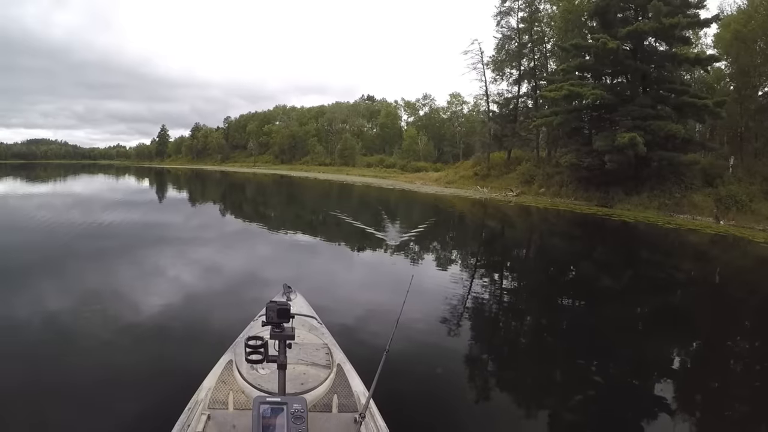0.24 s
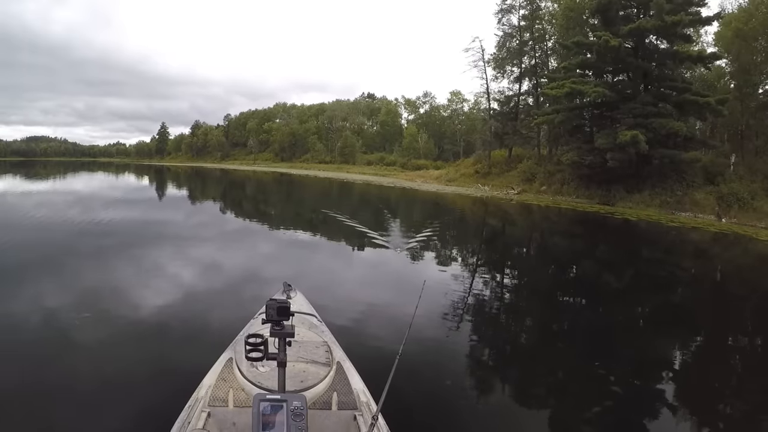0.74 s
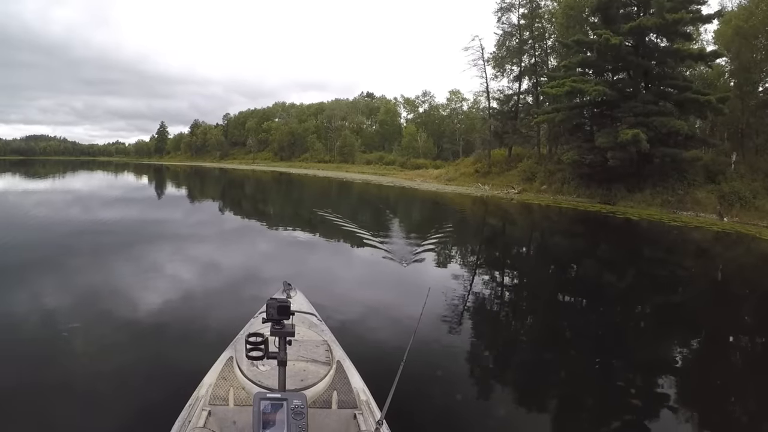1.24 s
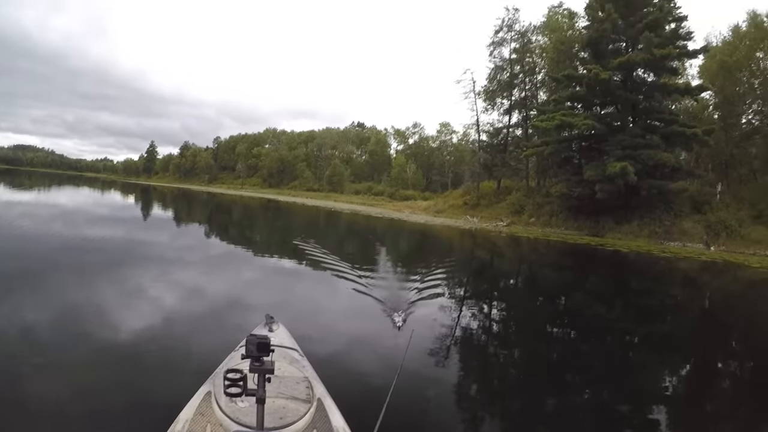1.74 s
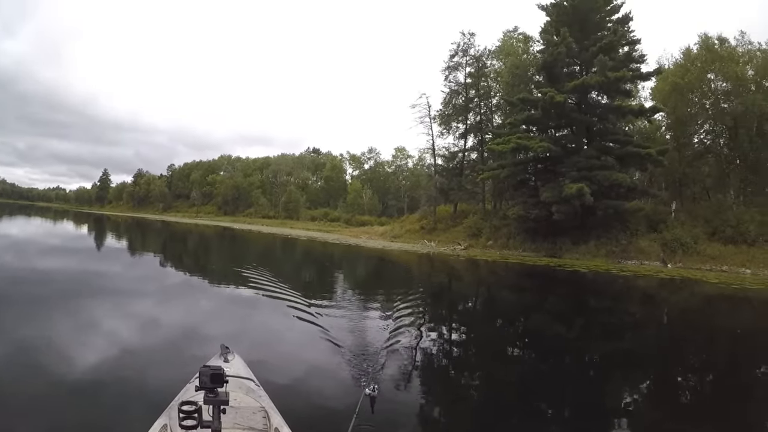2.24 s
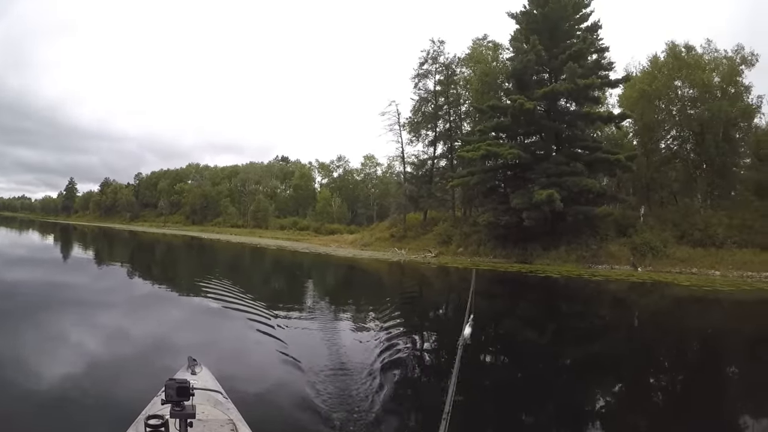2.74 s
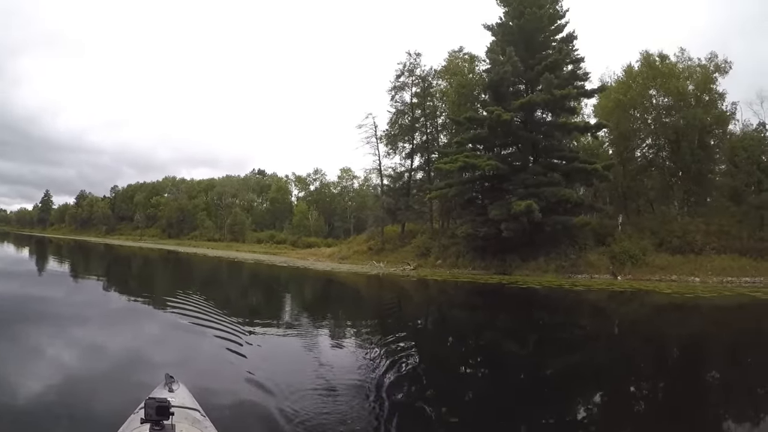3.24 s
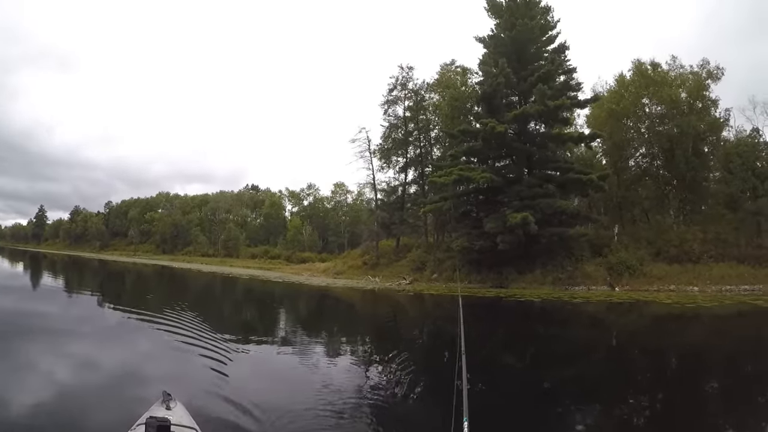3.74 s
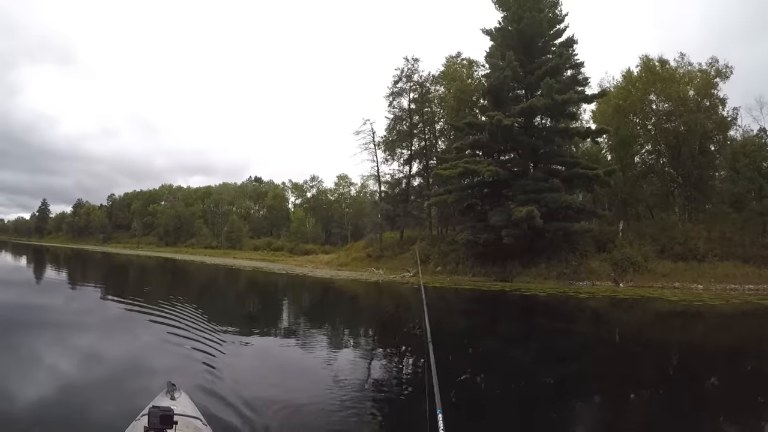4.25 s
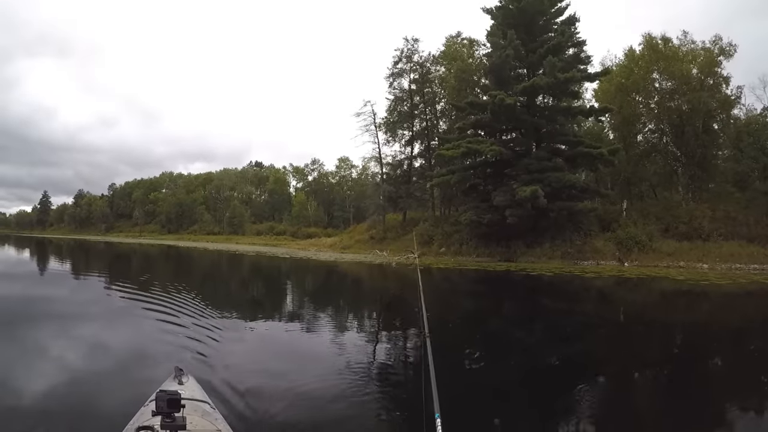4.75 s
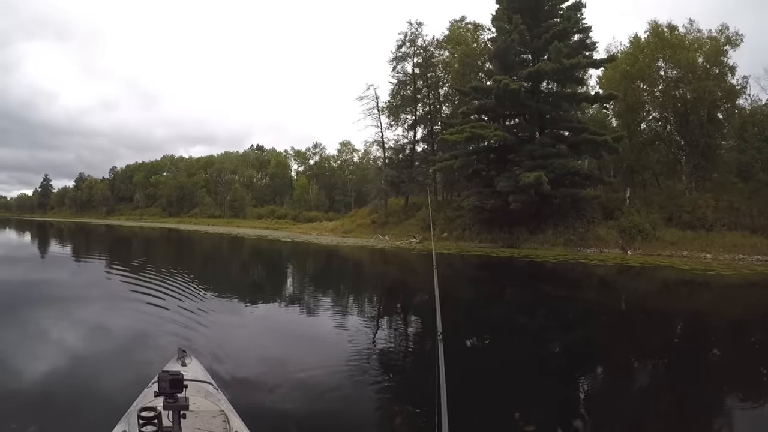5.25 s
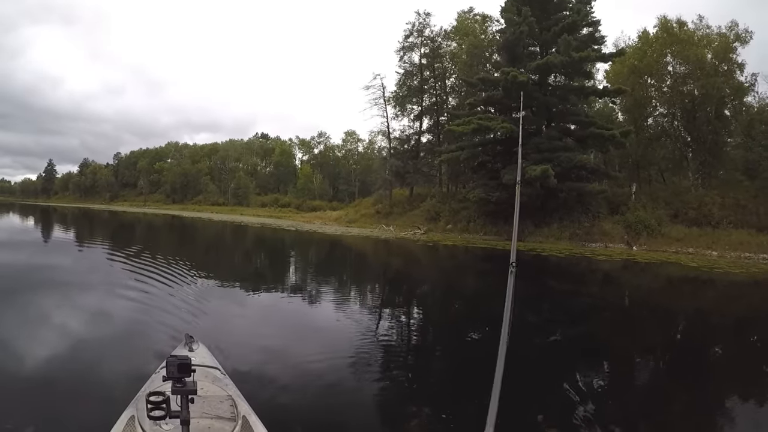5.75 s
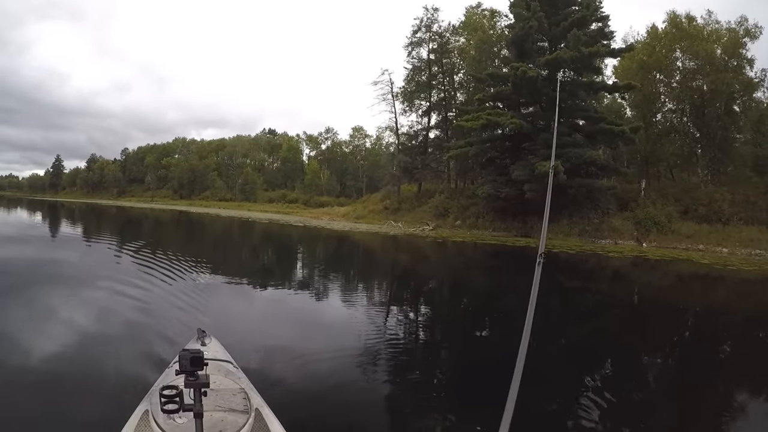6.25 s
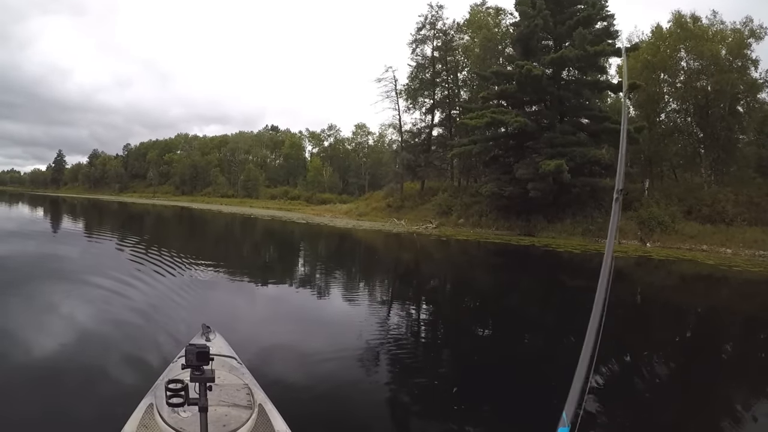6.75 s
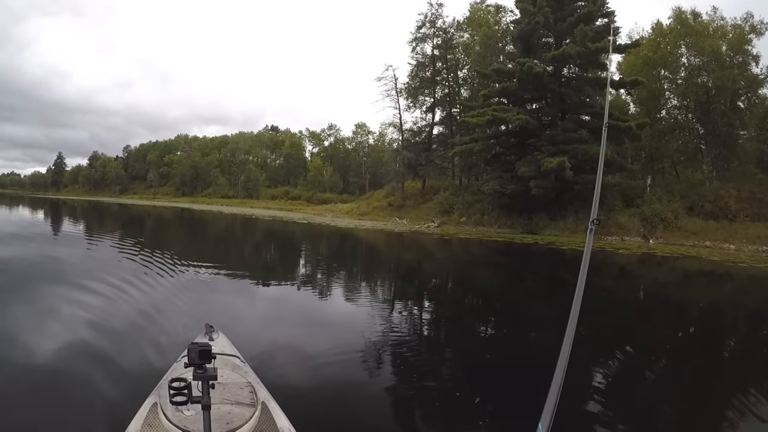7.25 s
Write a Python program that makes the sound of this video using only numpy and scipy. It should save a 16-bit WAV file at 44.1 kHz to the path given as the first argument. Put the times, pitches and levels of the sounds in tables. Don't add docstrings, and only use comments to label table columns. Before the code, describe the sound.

On a quiet lake, a lure burbles through the water, growing louder and splashier until it lifts out. A tiny squeak leads into a hard metallic reel click. The rod swishes, the spool buzzes and whirrs downward, and a thumb stops it as the lure plops faintly far away. A double metallic clack closes the reel. A faint insect trill and soft air continue throughout, heard by a small, close microphone with little deep bass.

```python
import sys
import numpy as np
from scipy import signal
from scipy.fft import rfft, irfft
from scipy.io import wavfile
from scipy.ndimage import uniform_filter1d

SR = 44100
rng = np.random.default_rng(int(sys.argv[2]) if len(sys.argv) > 2 else 0)


def pcm_store(signal):
    levels = np.round(np.clip(np.atleast_2d(signal), -1, 1) * 32767)
    wavfile.write(sys.argv[1], SR, levels.astype(np.int16).T)


def amplitude_ratio(level_db):
    exponent = np.asarray(level_db, float) / 20
    return 10 ** exponent


N = 329868


def evened(x):
    return x / np.sqrt(np.mean(x ** 2) + 1e-20)


def read(points, hz):
    f, value = np.transpose(points)
    return np.interp(np.log(hz + 1), np.log(f + 1), value)


def add(mix, start_s, sound):
    part = mix[round(start_s * SR):][:len(sound)]
    part += sound[:len(part)]


def controls(rows):
    times, *columns = np.transpose(rows)
    t = np.arange(times[0], times[-1], 1 / SR)
    return [times[0]] + [np.interp(t, times, column) for column in columns]


def noise(count):
    return rng.standard_normal(count)


def coloured(x, points):
    gain = amplitude_ratio(read(points, np.fft.rfftfreq(len(x), 1 / SR)))
    return evened(irfft(rfft(x) * gain, len(x)))


def wander(count, hz):
    width = int(SR / hz)
    return evened(uniform_filter1d(uniform_filter1d(noise(count), width), width))


def tone(hz):
    return np.sin(2 * np.pi * (np.cumsum(hz) / SR + rng.random()))


def resonate(x, hz, width_hz):
    turn = np.exp(2j * np.pi * np.cumsum(hz) / SR)
    r = np.exp(-np.pi * width_hz / SR)
    return 2 * (turn * signal.lfilter([1 - r], [1, -r], x / turn)).real


def bubble(hz, cycles, rise):
    u = np.arange(int(np.clip(cycles, 2, 40) * SR / hz)) * hz / SR
    ring = np.sin(2 * np.pi * u * (1 - 0.379 * rise + rise * u / cycles))
    swell = 1 - np.exp(-u / 0.75)
    return ring * swell * amplitude_ratio(-28 * (u / cycles) ** (1 + 2 * rise))


# [t/s, level/dB, brightness/dB per octave]
WAKE = [
    (0.0, -42.5, 1),
    (1.47, -44, -1.5),
    (1.59, -37.5, 0.5),
    (1.74, -36.5, 4.5),
    (2.09, -36, 2.5),
    (2.21, -36.5, 4.5),
    (2.38, -45, 2.5),
    (2.62, -71, 21.5),
]
# [f/Hz, level/dB per Hz]
FOAM = [(120, -46), (200, -10.5), (761, -4), (1110, -11.5), (1460, -4), (2130, -10), (3150, -12.5),
        (6050, -21.5), (8090, -18.5), (12000, -35), (15600, -76), (22000, -120)]
# [t/s, peak level/dB, f/Hz, climb in pitch/share]
BUBBLES = [(0.0615, -42.5, 912, 0.58), (0.1358, -36, 588, 0.03), (0.2333, -42.5, 760, 0.3),
           (0.272, -35, 840, 0.03), (0.2948, -37.5, 820, 0.11), (0.3267, -44, 703, 0.21),
           (0.5228, -39, 550, 0.03), (0.7717, -40.2, 752, 0.03), (0.9733, -40.5, 552, 0.11),
           (1.0751, -42, 905, 0.03), (1.3307, -39, 910, 0.03), (1.4451, -45, 804, 0.25),
           (1.4825, -37.4, 850, 0.03), (1.5108, -37, 856, 0.03), (1.5711, -37, 487, 0.12),
           (1.5872, -33, 844, 0.03), (1.6194, -31, 910, 0.13), (1.6716, -34.5, 800, 0.25),
           (1.6781, -37, 580, 0.45), (1.7111, -35.5, 586, 0.12), (1.7827, -34, 971, 0.03),
           (1.8799, -35.5, 960, 0.03), (1.9119, -33, 710, 0.03), (1.9402, -32.5, 560, 0.03),
           (1.9615, -38, 700, 0.52), (1.9781, -31.6, 519, 0.03), (1.9827, -43, 1110, 0.45),
           (2.0003, -36, 757, 0.31), (2.0703, -37, 912, 0.25), (2.0936, -36, 804, 0.03),
           (2.1244, -34.0, 900, 0.03), (2.1253, -36.5, 500, 0.3), (2.1348, -36, 710, 0.45),
           (2.1465, -27.5, 795, 0.03), (2.1824, -35, 560, 0.03), (2.1959, -39.5, 912, 0.25),
           (2.2491, -40, 667, 0.44), (2.2554, -29, 805, 0.26), (2.2668, -35, 980, 0.14),
           (2.297, -42.5, 620, 0.37), (2.369, -42, 804, 0.12),
           (0.0127, -40, 1767, 0.12), (0.0169, -43, 1487, 0.45), (0.0781, -38, 1621, 0.03),
          (0.198, -36, 1487, 0.03), (0.609, -38.5, 1365, 0.03), (0.7557, -36.5, 1553, 0.03),
          (0.8756, -29.5, 2100, 0.03), (0.9718, -40.5, 1440, 0.49), (1.017, -37.5, 1365, 0.03),
          (1.0946, -36, 1553, 0.03), (1.3135, -38, 1480, 0.03), (1.36, -34, 1700, 0.03),
          (1.5451, -36.4, 1300, 0.12), (1.563, -32.6, 1500, 0.03), (1.64, -32, 1553, 0.03),
          (1.6692, -32, 1767, 0.03), (1.6924, -29.9, 1300, 0.03), (1.8119, -33, 1830, 0.12),
          (1.8593, -35.5, 1767, 0.12), (1.868, -20.5, 1496, 0.027), (1.873, -30, 1470, 0.03),
          (1.9123, -31, 1487, 0.03), (1.9261, -41, 1693, 0.45), (1.9625, -36.3, 1320, 0.25),
          (1.9878, -25, 1400, 0.03), (1.9903, -41, 1365, 0.25), (2.0028, -29, 1440, 0.25),
          (2.0404, -30.9, 1540, 0.12), (2.0494, -32, 1310, 0.03), (2.108, -30.7, 1830, 0.03),
          (2.1165, -26, 1560, 0.03), (2.1441, -34.4, 1693, 0.12), (2.145, -42, 1130, 0.52),
          (2.1476, -22, 1415, 0.03), (2.1573, -32.5, 1621, 0.03), (2.1739, -29.8, 1365, 0.03),
          (2.2236, -31, 1630, 0.12), (2.261, -31, 1630, 0.03), (2.3307, -37, 2011, 0.12),
          (2.3596, -37.7, 1845, 0.03), (2.3672, -41, 2110, 0.25), (2.4042, -32, 1780, 0.03),
          (2.4104, -32.5, 1630, 0.12),
           (0.1222, -33, 2912, 0.03), (0.1355, -37, 2728, 0.03), (0.2123, -34, 2912, 0.03),
         (0.2439, -40, 2912, 0.25), (0.294, -36, 3500, 0.03), (0.494, -36, 2260, 0.03),
         (0.7045, -36.5, 3580, 0.03), (0.876, -32, 2350, 0.03), (0.9197, -38, 2242, 0.12),
         (1.0356, -34, 3783, 0.03), (1.119, -29.5, 2600, 0.03), (1.1262, -35, 3543, 0.03),
         (1.135, -41, 4914, 0.25), (1.1463, -37, 3319, 0.03), (1.1955, -37, 3500, 0.03),
         (1.2544, -27.5, 3050, 0.03), (1.3725, -41, 3109, 0.12), (1.4328, -39, 3109, 0.03),
         (1.6303, -33.5, 2912, 0.12), (1.7347, -36.4, 2912, 0.12), (1.7569, -35.5, 2912, 0.03),
         (1.8113, -33, 2555, 0.03), (1.8505, -35.2, 2370, 0.03), (1.8653, -38, 2728, 0.5),
         (1.9519, -29.5, 3580, 0.25), (1.9524, -33, 4311, 0.03), (1.9601, -34.9, 3543, 0.12),
         (2.0024, -32, 2300, 0.12), (2.0236, -22, 4070, 0.03), (2.028, -35.4, 2280, 0.33),
         (2.0492, -28, 4600, 0.03), (2.063, -26.5, 2420, 0.03), (2.1197, -30, 3130, 0.03),
         (2.1277, -31.9, 2393, 0.03), (2.1829, -16.5, 3170, 0.03), (2.1846, -31.8, 3109, 0.12),
         (2.2066, -25, 3800, 0.12), (2.2193, -36, 3319, 0.03), (2.2227, -35.1, 2393, 0.03),
         (2.2695, -33, 2242, 0.11), (2.2827, -31, 3109, 0.03), (2.324, -30, 3760, 0.03),
         (2.3255, -31, 3270, 0.03), (2.37, -28.2, 2393, 0.03), (2.3725, -34.6, 2540, 0.03),
         (2.5382, -36, 4070, 0.03)]
# [t/s, peak level/dB, f/Hz, climb in pitch/share]
GULPS = [
    (0.46, -46, 1100, .45),
    (0.985, -45, 650, 0.43),
    (1.155, -47, 790, .58),
    (1.338, -45, 950, 0.5),
    (2.19, -42, 598, 0.55),
]
# [t/s, peak level/dB, f/Hz]
LANDING = [(4.844, -42, 1430), (4.854, -43, 555), (4.891, -32, 587), (4.909, -46, 2980),
           (4.924, -41.5, 1290), (5.236, -44, 1330), (5.26, -47, 2000), (5.282, -46, 1250),
           (5.302, -45, 1550), (6.832, -46.5, 438), (6.879, -43, 735), (6.935, -40.5, 1230),
           (6.969, -43.5, 670)]
# [t/s, peak level/dB, f/Hz]
SPRAY = [(0.0957, -44, 2830), (0.1644, -44, 2740), (0.3516, -36, 3360), (0.395, -38, 3500),
         (0.6194, -39, 4090), (0.642, -40, 4000), (0.6674, -39, 2870), (0.7264, -40, 3430),
         (0.738, -40, 3500), (0.8244, -43, 3010), (0.852, -35, 2330), (0.949, -35, 2430),
         (0.972, -36, 3200), (1.297, -38, 1700), (1.3944, -43, 3500), (1.4583, -40, 3000),
         (1.7245, -37, 1960), (1.783, -34, 2370), (1.925, -38, 1970), (2.1061, -33, 1840),
         (2.2702, -32, 2420), (0.117, -41, 1400), (0.493, -40, 1580), (0.682, -39, 1400),
         (0.683, -41, 2900), (1.222, -39, 1450), (1.395, -41, 600), (1.614, -36, 4450), (1.677, -37, 4550),
         (1.764, -35, 3700), (1.811, -35, 4500), (1.845, -36, 4550), (1.925, -35, 3600), (1.958, -33, 4700),
         (2.196, -33, 5400)]
# [t/s, peak level/dB, f/Hz, length/cycles]
RIPPLES = [
    (3.79, -37, 275, 6.8),
    (2.2435, -16.5, 7600, 7.1),
    (5.19, -47, 3060, 18),
    (2.886, -38, 4200, 9.),
    (1.63, -37.5, 220, 5.4),
    (2, -50, 193, 7.),
    (6.9, -52, 1700, 27),
]


def lure(mix):
    start_s, level_db, tilt_db = controls(WAKE)
    count = len(level_db)
    crowd = np.zeros(count)
    for hz in np.geomspace(430, 5200, num=40):
        octaves = np.log2(hz / 1000)
        births = rng.random(count) < 38 / SR
        size = amplitude_ratio(5.5 * np.minimum(rng.exponential(1, count), 1.9)) * births
        pop = bubble(hz, rng.uniform(7.5, 19.0), rng.uniform(0.02, 0.49))
        pop = pop * np.sqrt(hz / 1000) * amplitude_ratio(read(FOAM, hz) + 0.9 * octaves)
        crowd += signal.oaconvolve(size * amplitude_ratio(tilt_db * octaves), pop)[:count]
    fizz = coloured(noise(count), FOAM) * amplitude_ratio(1.5 * wander(count, 40))
    water = amplitude_ratio(-0.5) * evened(crowd) + amplitude_ratio(-12) * fizz
    fade_out = signal.windows.tukey(2 * count, 0.1)[count:]
    add(mix, start_s, amplitude_ratio(level_db) * water * fade_out)

    ring_cycles, cycles_per_octave = 14.5, 1.6
    for s, db, hz, rise in BUBBLES + GULPS:
        rise = np.clip(rise, 0, 0.6)
        cycles = (ring_cycles + cycles_per_octave * np.log2(hz / 1000)) * (1 + rise)
        add(mix, s, amplitude_ratio(db) * bubble(hz, cycles, rise))

    drops = [(s, db, hz, ring_cycles) for s, db, hz in LANDING]
    drops += [(s, db, hz, 9.5) for s, db, hz in SPRAY]
    for s, db, hz, cycles in drops + RIPPLES:
        rise = 0.065 * (1000 / hz) ** 0.26
        add(mix, s, amplitude_ratio(db + 3.0) * bubble(hz, cycles, rise))


# [t/s, magnet poles passing/per s]
SPEED = [
    (3.66, 830),
    (3.8, 815),
    (3.96, 720),
    (4.32, 556),
    (4.44, 445),
    (4.6, 254),
    (4.66, 207),
    (4.72, 172),
    (4.812, 140),
]
# [t/s, hiss level/dB]
LINE = [
    (3.66, -34),
    (3.72, -45),
    (3.8, -46.5),
    (4.2, -48),
    (4.44, -44),
    (4.5, -48),
    (4.6, -53.5),
    (4.79, -58.5),
    (4.812, -76),
]
# [t/s, extra level/dB, width/s]
TUGS = [
    (3.765, 4, .015),
    (3.9, 3, .04),
    (4.155, 5.5, 0.014),
    (4.38, 1.5, .006),
    (4.425, 2, 0.017),
]
# [f/Hz, level/dB per Hz]
LINE_HISS = [(120, -35), (200, -15), (796, -7), (968, -6), (1080, -13), (1930, -3), (3120, -10),
             (5400, -8.5), (6200, -13.5), (7600, -7.5), (10800, -11.5), (12000, -23), (13000, -46),
             (13800, -60)]
# [spool speed/poles per s], [part of each chop held/share]
HOLD_LAW = [400, 585, 700], [.335, .36, .47]
# [tone level/dB, tone + pole rate level/dB, tone - pole rate level/dB]
BRAKE = [(-9, 1, -30), (-3, -2, 0), (-2, -9, -3), (-11, -2, -12), (-12, -14, -17), (-16, -15, -20),
         (-10, -13, -26), (-13, -15, -21), (-10, -15, -18), (-9, -10, -17), (-4, -14, -10), (-9, -24, -13),
         (-28, -45, -21), (-32, -45, -45)]
# [f/Hz, level/dB]
REEL_BODY = [(950, 0), (1150, -16), (1450, -11), (1600, -1), (12000, 0)]


def spool(mix):
    start_s, poles_hz = controls(SPEED)
    count = len(poles_hz)
    t = start_s + np.arange(count) / SR
    hold = np.interp(poles_hz, *HOLD_LAW)

    brake_db = -52 + 1.3 * np.log2(np.minimum(poles_hz / 550, 1))
    brake_db -= 25 * np.clip(1 - (t - start_s) / 0.11, 0, 1) ** 2
    brake_db -= 25 * np.clip(1 - (t[-1] - t) / 0.015, 0, 1)

    poles_hz = poles_hz + 4 * wander(count, 35)
    pull = np.minimum(poles_hz / 500, 1) ** 1.4
    chop_hz = 974.9 + 0.6 * wander(count, 30)
    brake = np.zeros(count)
    for k, levels_db in enumerate(BRAKE, 1):
        notch = np.sqrt(1 - np.cos(2 * np.pi * k * hold) * np.exp(-(k / 9) ** 4))
        for side, db, shape in zip((0, 1, -1), levels_db, (notch, pull, notch)):
            hz = k * chop_hz + side * poles_hz
            level = amplitude_ratio(db + read(REEL_BODY, hz) + 2.1 * wander(count, 45))
            brake += level * tone(hz) * shape * pull ** (k / 10)

    hiss_db = np.interp(t, *np.transpose(LINE))
    for at, db, width in TUGS:
        hiss_db = hiss_db + db * np.exp(-((t - at) / width) ** 2)
    hiss = coloured(noise(count), LINE_HISS) * amplitude_ratio(1.3 * wander(count, 60))
    hiss = hiss * np.minimum((t - start_s) / 0.022, 1)

    peak_s, rise_s, fade_s = 4.62, 0.11, 0.105
    whine_db = -56 - 3 * ((t - peak_s) / np.where(t < peak_s, rise_s, fade_s)) ** 4
    whine_hz = 22.1 * poles_hz + 45 * wander(count, 150)
    whine = np.sin(2 * np.pi * np.cumsum(whine_hz) / SR) * amplitude_ratio(3 * wander(count, 60))
    add(mix, start_s, amplitude_ratio(hiss_db) * hiss + amplitude_ratio(brake_db) * brake + amplitude_ratio(whine_db) * whine)


def snap(mix, blows, ring, rattle, ring_db, crack_db=-8):
    t = np.arange(6000) / SR
    crack = -amplitude_ratio(crack_db) * np.exp(-t / 0.00034) * np.cos(2 * np.pi * 3000 * t)
    ringing = np.zeros(len(t))
    for hz, db, t60 in ring:
        ringing += amplitude_ratio(db - 60 * t / min(t60, 0.025)) * np.sin(2 * np.pi * hz * t)
    no_bass = signal.butter(4, [330, 11600], "bandpass", fs=SR, output="sos")
    for s, db, t60 in blows:
        shake = coloured(noise(len(t)), rattle)
        low = signal.lfilter(*signal.butter(1, 2500, fs=SR), shake)
        rattling = low * amplitude_ratio(-60 * t / t60) + (shake - low) * amplitude_ratio(-95 * t / t60)
        onset = 1 - np.exp(-t / 0.00019)
        blow = (0.37 * rattling + amplitude_ratio(ring_db) * ringing) * onset + crack
        add(mix, s, amplitude_ratio(db) * signal.sosfilt(no_bass, blow))


# [t/s, peak level/dB, rattle t60/s]
CLUTCH_OPENS = [
    (2.9485, -12, 0.022),
    (2.9495, -5.5, 0.017),
    (2.9533, -29, 0.083),
]
# [f/Hz, level/dB, t60/s]
CLUTCH_RING = [(900, -19.5, 0.018), (1690, -3.5, 0.012), (5140, -8, 0.012), (3350, 6, 0.0064),
               (7700, -9, 0.012), (8750, -17, 0.022), (10780, -5, 0.0085), (11060, -20, 0.015)]
# [f/Hz, level/dB per Hz]
CLUTCH_RATTLE = [(300, -14), (700, -8), (1000, -12.5), (1700, -10), (2600, -10), (3500, -6), (6000, -9),
                 (10900, -15), (13500, -47)]
# [t/s, peak level/dB, rattle t60/s]
LATCH = [
    (2.9476, -11, 0.014),
]
# [f/Hz, level/dB, t60/s]
LATCH_RING = [(5600, 1, 0.0085), (3970, -8, 0.0092), (8500, -11, 0.01)]


def clutch_opens(mix):
    snap(mix, CLUTCH_OPENS, CLUTCH_RING, CLUTCH_RATTLE, -4.5, -2.7)
    snap(mix, LATCH, LATCH_RING, CLUTCH_RATTLE, -1.5, -20)


# [t/s, peak level/dB, rattle t60/s]
PAWL = [
    (6.0023, -10, 0.029),
    (6.005, -28, 0.06),
    (6.016, -28, 0.06),
]
# [f/Hz, level/dB, t60/s]
PAWL_RING = [(1900, 2.5, 0.011), (2830, -6, 0.015), (4000, -1, 0.012), (7140, 6, 0.009), (8000, -6, 0.009),
             (10100, -8, 0.006)]
# [f/Hz, level/dB per Hz]
PAWL_RATTLE = [(240, -52), (400, -14), (1340, -21), (1740, 5), (4100, -5), (5300, -10), (6860, 0),
               (10500, -19), (12200, -34), (13500, -50)]
# [t/s, peak level/dB, rattle t60/s]
CLUTCH_SHUTS = [
    (6.0173, -23, 0.055),
    (6.0191, -14, 0.018),
    (6.0215, -4, 0.014),
    (6.0235, -11.5, 0.03),
    (6.028, -21, 0.09),
    (6.036, -30, 0.068),
]
# [f/Hz, level/dB, t60/s]
SHUT_RING = [(1480, -17, 0.021), (2300, -17, 0.026), (4670, -3.5, 0.013), (5960, -7, 0.0098),
             (8086, -7, 0.015), (9630, -4, 0.012), (9260, -3.5, 0.014), (3930, -3.5, 0.013)]
# [f/Hz, level/dB per Hz]
SHUT_RATTLE = [(150, -46), (250, -7), (595, -3.5), (2010, -2), (2340, 4.5), (2630, -7), (4560, -3),
               (6700, -11), (9350, -9), (13500, -16)]
# [t/s, peak level/dB, rattle t60/s]
KNOCKS = [
    (2.9545, -26.5, .03),
    (6.026, -23.5, .04),
]
# [f/Hz, level/dB, t60/s]
KNOCK_RING = [(950, -0.5, 0.029), (1480, -6, .02)]


def clutch_shuts(mix):
    snap(mix, PAWL, PAWL_RING, PAWL_RATTLE, -10.5)
    snap(mix, CLUTCH_SHUTS, SHUT_RING, SHUT_RATTLE, -5.0, -0.5)
    snap(mix, KNOCKS, KNOCK_RING, SHUT_RATTLE, -2.5, -30)


# [t/s, peak level/dB, rattle t60/s]
THUMB_STOP = [
    (4.8132, -21, 0.022),
    (4.817, -33.5, 0.076),
    (4.892, -39, 0.046),
    (4.91, -40, 0.05),
    (5.25, -43, 0.11),
    (5.267, -41, 0.083),
    (5.285, -46, 0.1),
]
# [f/Hz, level/dB, t60/s]
THUMB_RING = [(1620, 5.5, 0.0086), (2500, 1, 0.008), (3130, 7, 0.009), (4600, -1, 0.012), (7700, 2, 0.0086),
              (10000, 3, 0.007)]
# [f/Hz, level/dB per Hz]
THUMB_RATTLE = [(240, -37), (400, -12), (1510, -8), (2170, -6), (3100, 1), (4000, -7), (4540, -6),
                (10400, -13.5), (13500, -41)]


def thumb_stop(mix):
    snap(mix, THUMB_STOP, THUMB_RING, THUMB_RATTLE, -14.0)


# [t/s, peak level/dB, rattle t60/s]
RELEASE = [
    (3.5262, -20, 0.058),
    (3.535, -30, 0.069),
]
# [f/Hz, level/dB, t60/s]
RELEASE_RING = [(1830, -13, 0.05), (2600, -11, 0.054), (3800, -5, 0.039), (5500, -23, 0.044),
                (9660, -8, 0.05), (11370, -24, 0.079)]
# [f/Hz, level/dB per Hz]
RELEASE_RATTLE = [(290, -38), (500, -20), (2580, -2.5), (2880, -10), (3220, 1), (4480, -3), (5140, 2),
                  (11000, -11), (13500, -47)]
# [t/s, peak level/dB, rattle t60/s]
TICKS = [
    (2.329, -28.5, 0.022),
    (3.08, -42, 0.032),
    (3.116, -41, 0.022),
    (3.39, -37, 0.025),
    (2.698, -38, 0.02),
    (3.037, -44, 0.015),
    (3.143, -44, 0.015),
    (6.681, -36.5, 0.023),
]


def cast_release(mix):
    snap(mix, RELEASE, RELEASE_RING, RELEASE_RATTLE, -9)
    snap(mix, TICKS, RELEASE_RING, RELEASE_RATTLE, -23, -4)


# [t/s of the peak, f/Hz, glide/Hz per ms, peak level/dB, fade/s]
SQUEAK = [
    (2.836, 6130, 60., -40.5, .005),
    (2.843, 7750, -20., -39, 0.0025),
    (2.851, 8000, 108, -37, 0.0024),
    (2.858, 7500, 4, -36.5, 0.012),
    (2.871, 7460, -42, -42, 0.0092),
    (2.895, 7120, -5., -44, 0.0046),
]


def thumb_bar(mix):
    rise_s = 0.0038
    for s, peak_hz, glide, db, fade_s in SQUEAK:
        t = np.arange(-2 * rise_s, 0.03, 1 / SR)
        hz = peak_hz + glide * t / 0.001
        turns = 2 * np.pi * np.cumsum(hz * (1 + 0.012 * wander(len(hz), 900))) / SR
        octave = np.sin(2 * turns) * (hz < 6800)
        rub = resonate(noise(len(hz)), 1.04 * hz, 3000)
        rub = evened(resonate(resonate(rub, 0.38 * hz, 3100), 0.9 * hz, 3100))
        swell_db = -13 * (t / np.where(t < 0, rise_s, fade_s)) ** 2
        squeak = np.sin(turns) + amplitude_ratio(-23) * octave + amplitude_ratio(-15.5) * rub
        add(mix, s + t[0], amplitude_ratio(db + 6.0 + swell_db) * squeak)


# [t/s, level/dB, vortex note f/Hz, vortex note level/dB]
SWISH = [
    (3.55, -48, 900, -17),
    (3.59, -41, 1190, -9),
    (3.615, -35.5, 3620, -12),
    (3.65, -36.5, 2500, -12),
    (3.685, -48, 1580, 7.5),
    (3.703, -37.5, 1370, -1),
    (3.71, -47, 1400, 2),
    (3.76, -44, 1300, -17),
]
# [f/Hz, level/dB per Hz]
SWISH_AIR = [(88, -34), (150, -2), (689, 0.5), (897, -4), (1150, -1), (2480, -2), (5790, -7), (7250, -8),
             (11200, -16), (13500, -47)]


def rod(mix):
    start_s, db, hz, note_db = controls(SWISH)
    rush = coloured(noise(len(hz)), SWISH_AIR)
    note = evened(resonate(resonate(noise(len(hz)), hz, 500), hz, 500))
    add(mix, start_s, amplitude_ratio(db) * (rush + amplitude_ratio(note_db) * note))


# [t/s, level/dB, width/s]
RUSTLES = [
    (4.435, -47.5, .03),
    (4.38, -47, .008),
    (5.27, -53.5, 0.04),
    (6.33, -62, 0.23),
    (6.899, -70, .08),
]


def sleeve(mix):
    width_hz = 890
    for s, db, width_s in RUSTLES:
        t = np.arange(-0.4, 0.4, 1 / SR)
        hz = 1500 + 150 * wander(len(t), 30)
        rub = evened(resonate(resonate(noise(len(t)), hz, width_hz), hz, 2 * width_hz))
        level = amplitude_ratio(db + 2.5 * wander(len(t), 70))
        add(mix, s + t[0], level * np.exp(-(t / width_s) ** 2) * rub)


# [t/s into the cycle], [pulse rate f/Hz]
TRILL_LAW = [0, .08, 1.1, 1.7, 2.45], [57.5, 68.5, 69.5, 57.5, 57.5]


def insect():
    cycle_s, start_s = 2.45, 1.78
    t = np.arange(N) / SR
    pulse_hz = np.interp((t - start_s) % cycle_s, *TRILL_LAW)
    beat = np.cumsum(pulse_hz) / SR % 1
    stroke = np.sin(np.pi * np.clip(beat / 0.8, 0, 1)) ** 2
    return amplitude_ratio(-57.5 + 1.3 * wander(N, 26)) * stroke * tone(5600 - 700 * beat + 60 * wander(N, 20))


# [f/Hz, level/dB per Hz]
AIR = [(18, -83), (30, -45), (59, -28.5), (84, -5), (108, -2.5), (201, -6.5), (235, -7), (469, -13),
       (577, -14), (1650, -20.5), (2910, -24.5), (5260, -26.5), (5830, -28), (10800, -34), (14000, -62)]


def open_air():
    return amplitude_ratio(-49.7 + 0.4 * wander(N, 2.5)) * coloured(noise(N), AIR)


def scene():
    mix = open_air() + insect()
    for source in (lure, spool, clutch_opens, clutch_shuts, thumb_stop, cast_release, thumb_bar, rod, sleeve):
        source(mix)
    return np.array([mix, mix])


def top_cut(x):
    return signal.sosfilt(signal.butter(12, 14120, fs=SR, output="sos"), x)


# [f/Hz, level/dB per Hz]
PORT_HISS = [(24, -55), (40, -25), (103, -1), (220, -0.5), (415, -1), (1370, -3.5), (3060, -5.5),
             (10600, -13.5), (12000, -24), (13500, -43)]


def record(dry):
    band = signal.butter(6, [42, 13000], "bandpass", fs=SR, output="sos")
    heard = signal.sosfilt(band, dry[0])
    steep_top = signal.firwin(511, 13900, window=("kaiser", 9), fs=SR)
    heard = signal.oaconvolve(heard, steep_top, "same")
    side = amplitude_ratio(-64) * coloured(noise(N), PORT_HISS)
    return top_cut(np.array([heard + side, heard - side]))


dry = scene()
out = record(dry)
pcm_store(out)
```